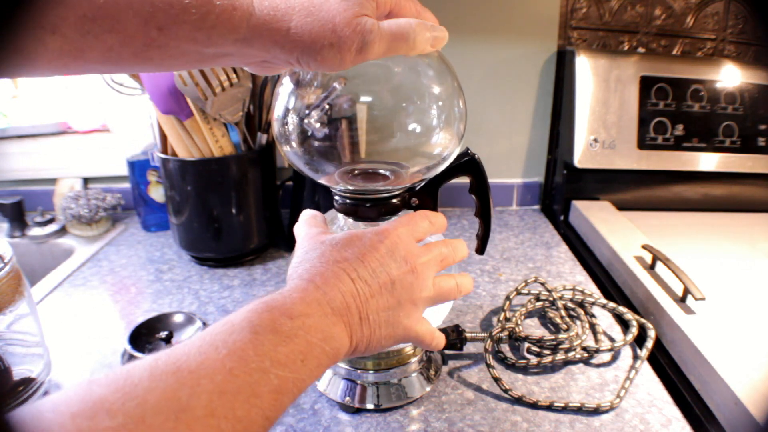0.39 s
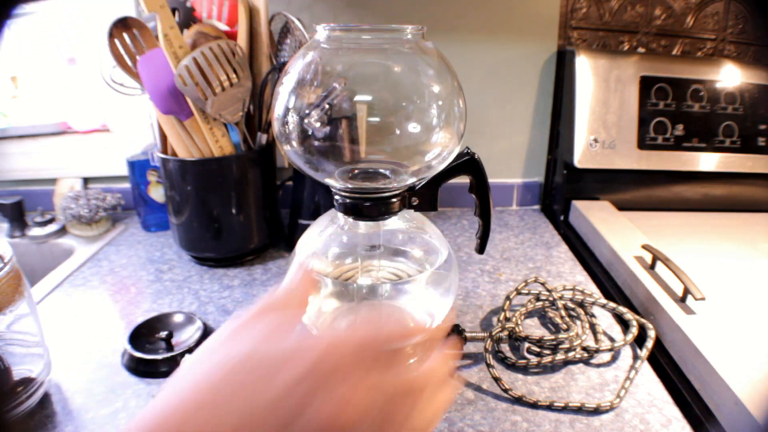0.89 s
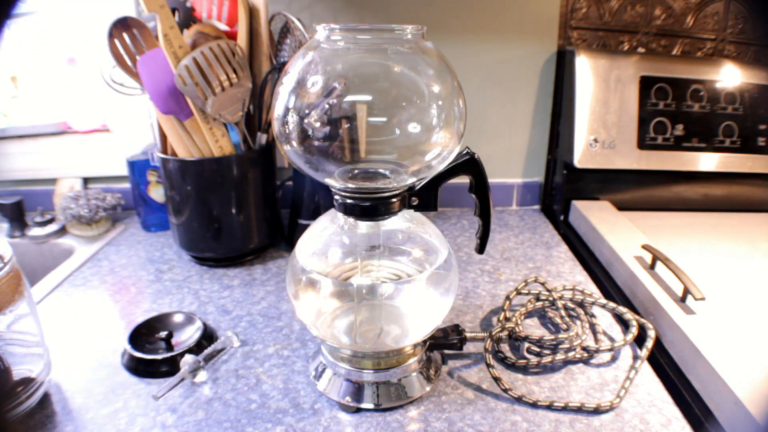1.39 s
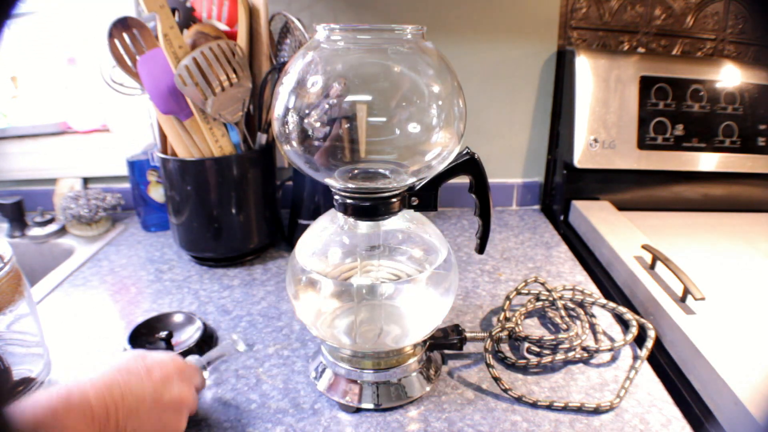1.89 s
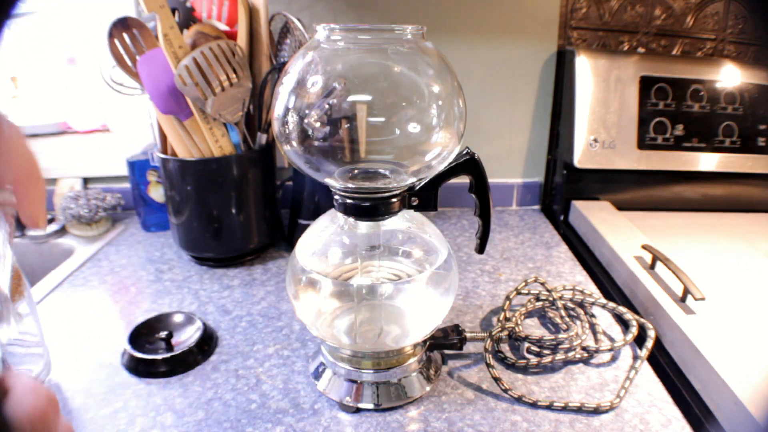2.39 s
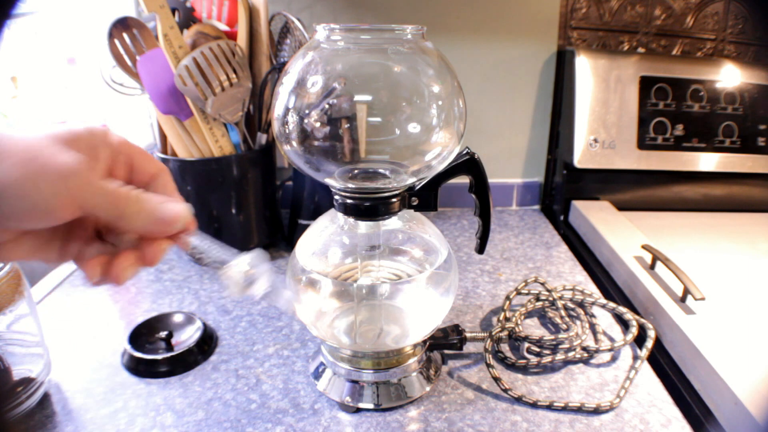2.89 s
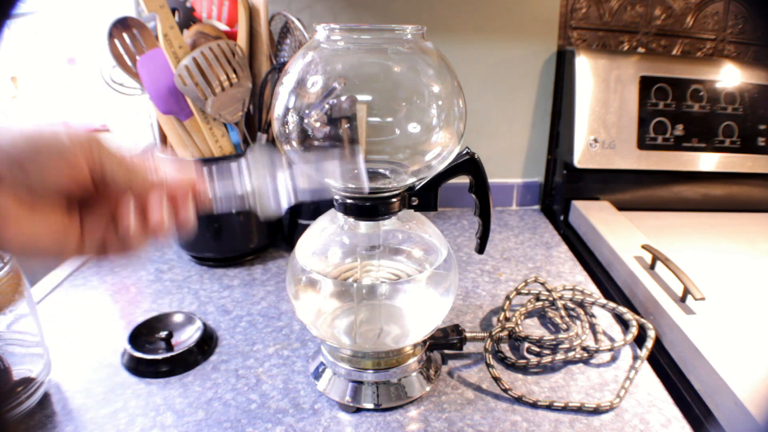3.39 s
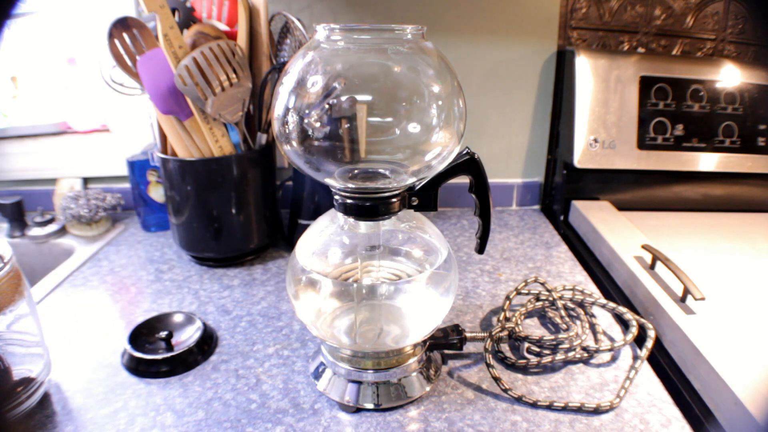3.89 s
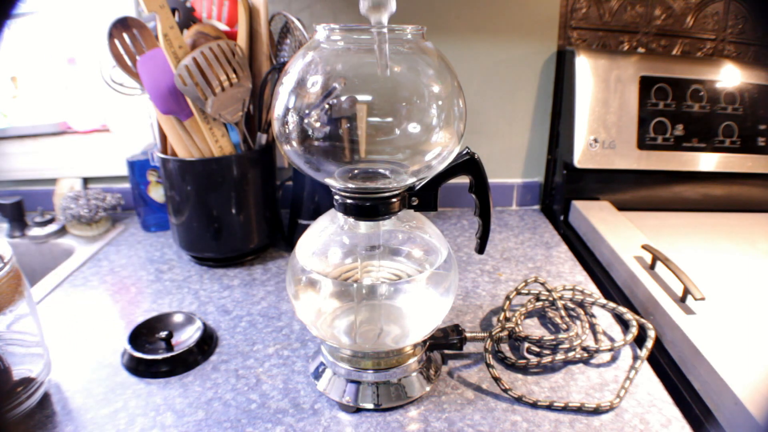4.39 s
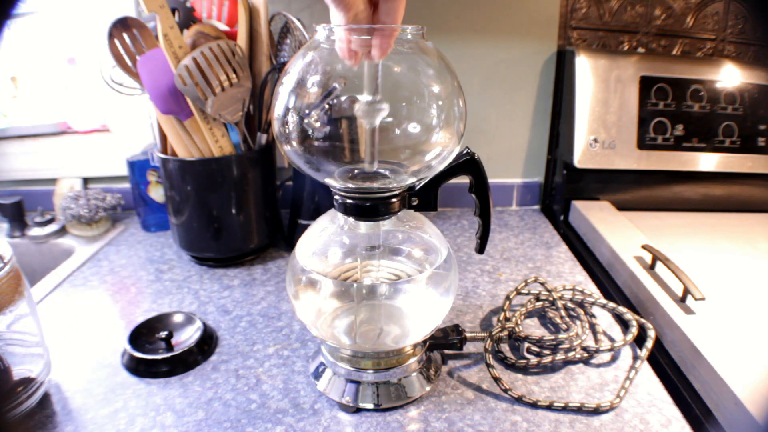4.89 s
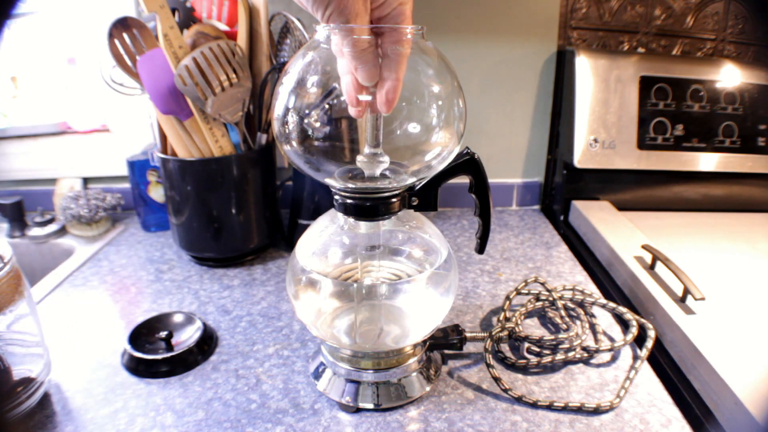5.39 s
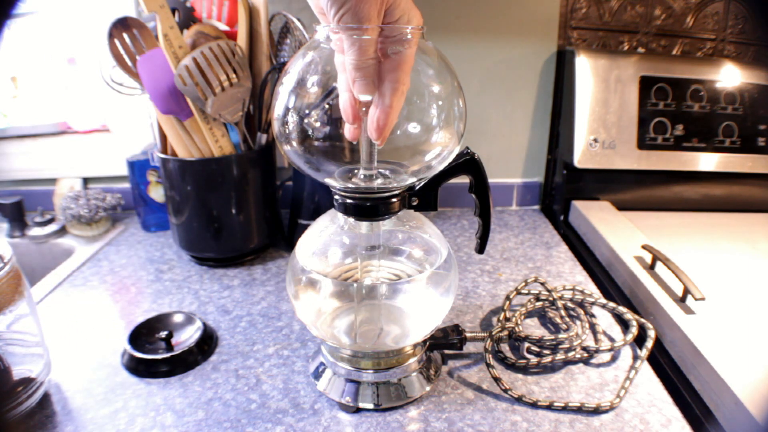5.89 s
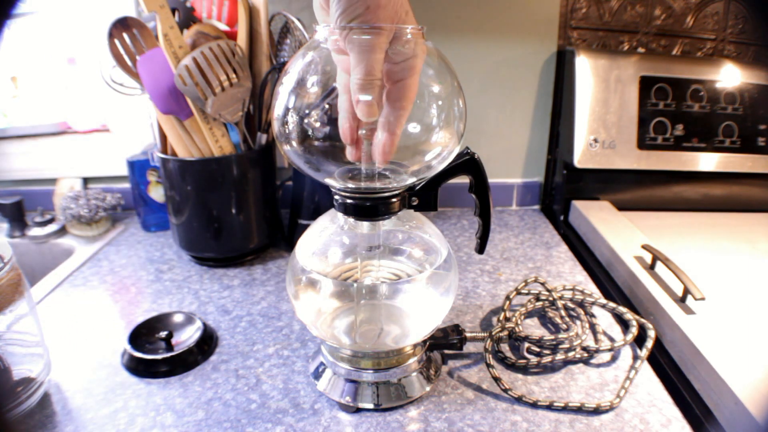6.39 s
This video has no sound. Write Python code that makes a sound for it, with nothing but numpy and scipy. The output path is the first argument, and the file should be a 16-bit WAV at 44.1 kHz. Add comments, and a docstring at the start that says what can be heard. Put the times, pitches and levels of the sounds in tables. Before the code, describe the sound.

Close, quiet kitchen: palms rub glass, a small clatter on a countertop, a pause, then a glass rod clinking and dragging in a bowl.

```python
"""A glass rod is lowered by hand into a glass bowl, close to the microphone in a quiet kitchen. It clinks
and drags on the wall: ringing modes driven by blows and grit. The grip tightens as the rod goes deeper,
so its ring sinks in pitch. Before that, palms twist the bowl onto a pot in gritty skin noise and damped
glass modes, a metal stand rattles, and the rod rolls and knocks on the counter in short dull modes.
Behind: sleeve rustle, small ticks, air hiss, an appliance drone, mains hum and the kitchen's echoes."""
import sys
import numpy as np
from scipy import signal
from scipy.io import wavfile
from scipy.ndimage import uniform_filter1d

SR = 44100
rng = np.random.default_rng(int(sys.argv[2]) if len(sys.argv) > 2 else 0)


def unload_wav(signal):
    """Save mono or channel-first audio to the path in sys.argv[1] as 16-bit WAV at rate SR, clipped to [-1, 1]."""
    wavfile.write(
        sys.argv[1],
        SR,
        np.round(np.clip(np.atleast_2d(signal).T, -1, 1) * 32767).astype(np.int16),
    )


def level_to_linear(level):
    """Convert decibel levels to linear amplitude factors, elementwise."""
    exponent = np.asarray(level, float) / 20
    return 10 ** exponent


N = 287973  # samples
START = 5 * SR  # samples; the bowl and rod modes ring only from here

# clinks of rod on bowl: start_s, rod_db, then bowl_db at each of the three tones
CLINKS = [(5.1153, -28.5, -25, -22.5, -15.5), (5.1225, -49, -41, -45, -30),
          (5.371, -29.5, -28.5, -5.5, -15.5), (5.3773, -24.5, -51, -47, -35), (5.57, -46, -50, -41, -16.5),
          (5.5739, -32, -23.5, -9.5, -55), (5.622, -16, -20, -11.5, -26),
          (5.7276, -30.5, -32, -13.5, -38.5), (5.9255, -75, -29.5, -48, -81), (5.943, -43, -56, -34, -42),
          (6.058, -57, -53, -43, -66), (6.306, -48, -28.5, -44, -64), (6.324, -60, -25.5, -33, -52),
          (6.336, -28, -27.5, -19.5, -22.5), (6.349, -31.5, -22.5, -16, -36),
          (6.4819, -31.5, -24, -17.5, -62), (6.509, -29, -31, -21, -63)]
# the three tones at which the colour of a clink is given: tone_hz
TONES_HZ = [800, 2280, 7900]
# rod dragging on the wall: start_s, hold_s, rod_db, low_modes_db, high_modes_db
DRAGS = [(5.574, 0.011, -29, -29.5, -35), (5.627, 0.034, -49, -23, -29.5),
         (5.689, 0.056, -33.5, -22.5, -48), (5.936, 0.064, -47.5, -48, -70),
         (6.344, 0.054, -39.5, -34.5, -42), (6.481, .06, -35, -24.5, -51)]
# how a drag's level moves: rise, sag while held, fall [all dB a second]
DRAG_SLOPES = (2800, 166, 800)
# when the rod tip passes rim, shoulder, belly and neck: time_s
PLACES_S = [5.12, 5.37, 5.65, 6.34]
# pitches of the bowl's modes: pitch_hz
BOWL_HZ = [700, 812, 1090, 1635, 1812, 2078, 2255, 2440, 2700, 3740, 4085, 4400, 4660, 5212, 7200, 7526,
           7650, 7775, 7935, 8180, 8825, 9085, 9465, 9980, 10348, 10740, 11140, 11840, 12300, 13520]
# the bowl's modes, one row per pitch: t60_s, then level_db when touched at rim, shoulder, belly, neck
BOWL_MODES = [(0.13, -7, -6, -13, -8.5), (0.079, -2.5, 2.5, -1, -2.5), (0.016, 4, 8, 7, 9),
              (0.092, -10, -10, -8.5, -11.5), (0.019, -13, -16, 1.5, 3.5), (0.033, 1, 4.5, -0.5, -9),
              (0.033, 3, 3.5, -6.5, 4), (0.029, -26, 7, -6, -4.5), (0.022, -9, -4.5, -13, -14),
              (0.019, -38, -36, -4.5, -10), (.1, -15, -21, -9.5, -27), (0.056, -11, -23, -6.5, -10),
              (0.035, -35, -41, -10, -6), (0.035, -10, -7, -8, -5), (0.033, -3, -6, -12, -5),
              (0.053, 1.5, -3, -12, -1), (0.1, -4, -20, -22, -14), (0.071, -2, 4, -1.5, -2.5),
              (0.078, -11, -5, -18, -16), (0.026, -7, -7, 2.5, 6.5), (0.09, 3, -9, -4, -10),
              (0.082, -18, -15, -32, -19), (0.066, -31, -8, -40, -28), (0.058, -30, -7, -28, -35),
              (0.08, -19, 0, -26, -29), (0.068, -20, -11, -22, -27), (0.075, 4, -4, -12, -24),
              (0.066, -3, -24, -22, -25), (0.068, -14, -16, -22, -28), (.04, -15, -26, -24, -26)]


def bowl():
    """Clinks and drags drive the bowl's modes by their colour and by the place they touch."""
    # the bowl is not quite round: each mode has a close, fainter twin that rings longer
    twin_ratio, twin_db, twin_lasts = 1.003, -23, 3.6
    start_s, _, *tones_db = np.transpose(CLINKS)
    drag_s, hold_s, _, low_db, high_db = np.transpose(DRAGS)
    t = np.arange(START, N) / SR
    catches = grit(2500, 2.5)
    low = (catches * strokes(drag_s, hold_s, low_db, DRAG_SLOPES))[START:]
    high = (catches * strokes(drag_s, hold_s, high_db, DRAG_SLOPES))[START:]
    out = np.zeros(N)
    for hz, (t60, *place_db) in zip(BOWL_HZ, BOWL_MODES):
        blow_db = [read(list(zip(TONES_HZ, clink_db)), hz) for clink_db in np.transpose(tones_db)]
        drag = low if hz < 3000 else high
        drive = blows(start_s, blow_db)[START:] + drag
        answer = level_to_linear(np.interp(t, PLACES_S, place_db))
        drive = bloom(drive * answer, hz, 0.0018)
        out[START:] += ring(drive, hz, t60)
        out[START:] += level_to_linear(twin_db) * ring(drive, hz * twin_ratio, t60 * twin_lasts)
    # the bare catches of a drag, heard beside the ring
    out[START:] += level_to_linear(12.5) * np.diff(high + level_to_linear(-11) * low, prepend=0)
    return out + cracks(start_s, tones_db[1], tones_db[2])


def cracks(start_s, middle_db, treble_db):
    """The bare tick of glass on glass under the ring: a noise burst, its dull and bright parts apart."""
    age_s = np.arange(800) / SR
    tick = rng.standard_normal(800) * level_to_linear(-60 * age_s / 0.014)
    dull = signal.sosfilt(signal.butter(4, 3200, fs=SR, output="sos"), tick)
    bright = tick - dull
    out = level_to_linear(2) * signal.oaconvolve(blows(start_s, middle_db), dull)
    out = out + level_to_linear(-1) * signal.oaconvolve(blows(start_s, treble_db), bright)
    return out[:N]


# the held rod's modes before any shift, the lowest being the air in the bowl: pitch_hz
ROD_HZ = [296, 1348, 3322, 5592, 8580]
# the rod's modes, one row per pitch: t60_s, then level_db at the four places, share of the pitch shift
ROD_MODES = [(0.2, -30, 0, -0.5, 7, 1.62), (0.17, 4, -1, 0.5, 1, 1.05), (0.069, -29, -5, -7, -9, 0.74),
             (0.013, 3, -4, -6, -8, 0.415), (0.051, -12, -9, -10.5, -8, 0.57)]
# pitch shift as hand and rod go down: time_s, shift [fraction of the pitch, at a share of 1]
GRIP = [(5.12, .05), (5.38, .022), (5.58, .003), (5.7, -.003), (5.95, -.02), (6.33, -.067), (6.5, -.08)]
# the rod singing on the wall: start_s, hold_s, level_db of the second mode, overtones_db of those above
SINGING = [(5.586, 0.038, -27.5, -47), (5.648, 0.042, -17.5, -25.5), (5.737, .14, -36.5, -56)]
# how the song's level moves: rise, sag while held, fall [all dB a second]
SING_SLOPES = (1360, 117, 3000)


def rod():
    """The rod rings at the pitch its grip allows; sticking and slipping on the wall, it sings there too."""
    start_s, rod_db = np.transpose(CLINKS)[:2]
    t = np.arange(START, N) / SR
    drags = grit(2700, 3.3) * strokes(*np.transpose(DRAGS)[:3], DRAG_SLOPES)
    drive = (blows(start_s, rod_db) + drags)[START:]
    shift = np.interp(t, *np.transpose(GRIP))
    sing_s, hold_s, song_db, overtones_db = np.transpose(SINGING)
    song = strokes(sing_s, hold_s, song_db, SING_SLOPES)[START:]
    overtones = strokes(sing_s, hold_s, overtones_db, SING_SLOPES)[START:]
    out = np.zeros(N)
    for k, (hz, (t60, *place_db, share)) in enumerate(zip(ROD_HZ, ROD_MODES)):
        answer = level_to_linear(np.interp(t, PLACES_S, place_db))
        pitch_hz = hz * (1 + share * shift)
        out[START:] += ring(bloom(drive * answer, hz, 0.00146), pitch_hz, t60)
        if k == 0:  # the air in the bowl does not sing
            continue
        # contact wavers, most in the overtones
        flutter_db = (1.4 + 1.2 * k) * evened(uniform_filter1d(rng.standard_normal(len(t)), 450))
        level = answer * level_to_linear(flutter_db) * (overtones if k > 1 else song)
        out[START:] += level * np.sin(2 * np.pi * np.cumsum(pitch_hz) / SR)
    return out


# counter and plastic lid, dull and short: pitch_hz, level_db, t60_s
COUNTER_MODES = [(400, -43, 0.044), (510, 1.5, 0.032), (602, 13.5, 0.021), (703, 11.5, 0.012),
                 (865, -3.5, 0.012), (1020, 6.5, 0.017), (1300, 7.5, 0.017), (1550, -14, 0.022),
                 (1706, 8.5, 0.0074), (1895, 6.5, 0.0099), (2240, 8.5, 0.0042), (2505, -1, 0.0073),
                 (2770, -32, .02), (4780, -11, 0.0024), (8040, -24.5, 0.0031), (10200, -24.5, 0.0019)]
# knocks on the counter: start_s, level_db, tilt_db [an octave]
KNOCKS = [(1.841, -25, -16), (1.854, -19, -13.5), (1.8835, -26, 5), (1.884, -7, -13.5),
          (1.888, -11.5, -3.5), (1.893, -19, -7.5), (1.918, -22, -22), (1.939, -25, -4.5), (1.9578, -20, 2),
          (1.9587, -19, 7), (1.963, -6, -17), (1.9683, -35, 9)]
# rod rolling against the lid: start_s, hold_s, level_db
ROLLS = [(1.842, .005, -28), (1.895, 0.0067, -24), (1.93, 0.032, -30)]
# how a roll's level moves: rise, sag while held, fall [all dB a second]
ROLL_SLOPES = (1300, 30, 570)


def counter():
    """The rod rolls against the lid with a bumpy rumble and knocks the counter: grit and blows on modes."""
    rolling = grit(186, 6.4) * strokes(*np.transpose(ROLLS), ROLL_SLOPES)
    return struck(COUNTER_MODES, KNOCKS, rolling, -5)


# palms twisting the bowl: start_s, hold_s, level_db, tilt_db [an octave]
TWIST = [(0.0, 0.0046, -35, -5.5), (0.057, 0.084, -27.5, -4), (0.179, .004, -41, -1.5),
         (0.206, 0.1, -27, -2.5), (0.346, 0.037, -29, -3), (0.6, 0.016, -50, 2), (0.662, 0.02, -32, -3),
         (0.724, 0.0026, -38.5, 1.6)]
# how a twist's level moves: rise, sag while held, fall [all dB a second]
TWIST_SLOPES = (740, 28, 770)
# colour of skin on glass: freq_hz, level_db [per Hz, relative]
SKIN = [(88, -56), (150, -23), (193, -5), (334, -2.5), (391, 1), (484, -14), (730, -4.5), (923, -21),
        (1760, 1), (4240, -8), (8730, -6.5), (14200, -3), (16000, -70)]
# glass damped under the palms: pitch_hz, width_hz [a wider mode dies sooner], level_db
SKIN_RING = [(700, 146, -16.5), (1152, 68, -17), (1470, 27, -21), (2038, 74, -12.5), (3280, 81, -16.5),
             (5230, 160, -20.5), (7650, 260, -14.5), (8660, 390, -11.5), (8840, 120, -19.5),
             (9240, 120, -42)]


def palms():
    """Skin slips on glass in gritty noise and sets the damped bowl singing."""
    start_s, hold_s, level_db, tilt_db = np.transpose(TWIST)
    middle_s = start_s + hold_s / 2

    def skin_db(hz, t):
        return read(SKIN, hz) + np.interp(t, middle_s, tilt_db) * np.log2(hz / 3000 + 0.026)

    skin = noise(skin_db, 2.0, size=256)
    slips = level_to_linear(1.3 * evened(uniform_filter1d(rng.standard_normal(N), 150)))
    rough = rng.standard_normal(N) * slips
    sung = sum(level_to_linear(db) * evened(ring(rough, hz, 4.0 / width)) for hz, width, db in SKIN_RING)
    return strokes(start_s, hold_s, level_db, TWIST_SLOPES) * evened(skin * slips + sung)


# small slips and grabs of the palms: start_s, level_db, tilt_db [an octave]
SLIPS = [(.031, -42, -3), (.039, -40, 0), (.048, -19, -5.5), (.148, -37, 1), (.178, -37.5, 1),
         (.529, -49, 1), (.655, -20, -20), (.728, -34.5, -3.5)]


def grabs():
    """A sudden slip of skin knocks the damped bowl, ringing its modes once."""
    modes = [(hz, db + 15, 2.0 / width) for hz, width, db in SKIN_RING]
    return struck(modes, SLIPS)


# metal stand: pitch_hz, level_db, t60_s
STAND_MODES = [(1580, -2.5, 0.71), (4300, -1.5, 0.076), (7170, -22, 0.15), (10300, -28, .1)]
# its rattles: start_s, level_db, tilt_db [an octave]
PINGS = [(0.685, -47, 8), (.696, -57, 12), (0.715, -66, 8), (.727, -56, 14), (0.797, -65, 15.5),
         (0.821, -38.5, 0), (0.847, -48, -5)]


def stand():
    """The metal stand rattles: light blows on a few long modes."""
    return struck(STAND_MODES, PINGS)


# short ticks of fingers, rod and lid: start_s, level_db, pitch_hz, t60_s
TICKS = [(0.468, -23, 400, 0.01), (.685, -31.5, 1530, 0.04), (1.748, -37, 2370, 0.064),
         (1.9588, -9, 2850, 0.005), (2.83, -50, 8820, .08), (3.099, -32, 3400, 0.011),
         (3.38, -52, 3300, .015), (3.71, -39, 5000, .005), (3.75, -43, 2390, 0.076),
         (5.794, -34.5, 2385, 0.072), (5.944, -30.5, 3150, 0.054), (6.062, -39, 2990, .02)]


def ticks():
    """Each tick is one push on one short mode."""
    return sum(ring(blows([s], [db]), hz, t60) for s, db, hz, t60 in TICKS)


# sleeve rustling: start_s, hold_s, level_db
RUSTLE = [(1.374, 0.051, -43.5), (2.658, 0.11, -50.5), (3.097, .004, -41.5), (3.366, 0.051, -49.5)]
# how a rustle's level moves: rise, sag while held, fall [all dB a second]
RUSTLE_SLOPES = (460, 31, 470)
# colour of cloth: freq_hz, level_db [per Hz, relative]
CLOTH = [(300, -8), (1500, 0.5), (3000, -1.5), (8000, -13.5), (12000, -17), (16000, -34)]


def sleeve():
    """Cloth only hisses: coloured noise let through in short strokes."""
    cloth = noise(lambda hz, t: read(CLOTH, hz) + 0 * t, 0.31, size=256)
    return strokes(*np.transpose(RUSTLE), RUSTLE_SLOPES) * cloth


# colour of the room tone before the hiss: freq_hz, level_db [per Hz, relative]
AIR = [(12, -50), (20, -39), (53, -16), (91, -12.5), (113, -11), (193, -7.5), (222, 0), (434, -2),
       (574, -2.5), (949, -5), (1530, -9), (1810, -12), (2390, -16), (9400, -32), (16000, -49.5)]


def room_air():
    """Steady air noise, with a treble hiss that fades slowly against the rest."""
    def air_db(hz, t):
        hiss_db = 8.5 - 0.35 * t  # reached only well above 2500 Hz
        return read(AIR, hz) + hiss_db * hz / (hz + 2500)

    return level_to_linear(-47.5) * noise(air_db, 0.6, size=2048)


# appliance drone: pitch_hz, level_db [rms], width_hz
DRONE = [(54.4, -70, 5.9), (208.2, -60, 23), (400, -56.5, 31)]


def appliance():
    """A wavering drone: noise through a few narrow resonances."""
    return sum(level_to_linear(db) * evened(ring(rng.standard_normal(N), hz, 2.24 / width)) for hz, db, width in DRONE)


# steady electric hum, a single row: pitch_hz, level_db [peak]
MAINS = (120, -64)


def mains_hum():
    """Steady electric hum: one sine."""
    hz, level_db = MAINS
    return level_to_linear(level_db) * np.sin(2 * np.pi * hz * np.arange(N) / SR)


# near echoes off counter and tiles: delay_s, level_db [relative to the direct sound]
ECHOES = [(.0013, -13), (.0032, -12), (.0062, -15), (.0078, -12), (0.009, -15), (0.0129, -32)]
# how fast the kitchen dies away: freq_hz, t60_s
KITCHEN_DECAY = [(300, 0.26), (1500, 0.2), (5000, 0.24), (12000, 0.028)]


def kitchen(x):
    """A few near echoes, then sparse taps of random sign, each band dying at its own speed."""
    taps = np.zeros(SR // 2)
    at = np.arange(300, len(taps) - 20, 20)
    taps[at + rng.integers(0, 20, len(at))] = rng.choice([-1., 1.], len(at))
    hz, t, z = signal.stft(taps, SR, nperseg=256)
    decay_db = -60 * t / read(KITCHEN_DECAY, hz)[:, None]
    tail = signal.istft(z * level_to_linear(decay_db), SR, nperseg=256)[1]
    tail *= level_to_linear(-12) / np.linalg.norm(tail)
    tail[0] += 1  # the direct sound
    for delay_s, db in ECHOES:
        tail[round(delay_s * SR)] += level_to_linear(db)
    return signal.oaconvolve(x, tail)[:N]


def evened(x):
    """Scales to rms 1."""
    return x / np.sqrt(np.mean(x ** 2) + 1e-20)


def read(points, hz):
    """Looks a value up on a log-frequency axis."""
    f, value = np.transpose(points)
    return np.interp(np.log(hz + 1), np.log(f + 1), value)


def blows(s, db):
    """Single pushes at given times."""
    out = np.zeros(N)
    np.add.at(out, np.round(np.asarray(s) * SR).astype(int), level_to_linear(np.asarray(db)))
    return out


def ring(drive, hz, t60):
    """A dying mode, fixed or gliding: a push of 1 rings at height 1."""
    r = np.exp(-np.log(1000) / (max(t60, .002) * SR))
    if np.ndim(hz) == 0:
        w = 2 * np.pi * hz / SR
        return signal.lfilter([0, np.sin(w)], [1, -2 * r * np.cos(w), r * r], drive)
    turn = np.exp(2j * np.pi * np.cumsum(hz) / SR)
    return (turn * signal.lfilter([1], [1, -r], drive / turn)).imag


def bloom(drive, hz, rise_s):
    """A contact is not instant: the push builds the mode up over a short while."""
    t = np.arange(max(round(rise_s * SR), 3)) / SR
    window = np.hanning(len(t) + 2)[1:-1]
    push = 2 * window * np.cos(2 * np.pi * hz * t) / window.sum()
    return np.convolve(drive, push)[:len(drive)]


def struck(modes, hits, extra=0, extra_tilt_db=0):
    """Hits with a tilt, and any rubbing, ring one table of modes; a contact lasts about two cycles."""
    s, db, tilt_db = np.transpose(hits)
    out = np.zeros(N)
    for hz, mode_db, t60 in modes:
        octaves = np.log2(hz / modes[0][0])  # above the first mode
        drive = blows(s, db + tilt_db * octaves) + extra * level_to_linear(extra_tilt_db * octaves)
        out += level_to_linear(mode_db) * ring(bloom(drive, hz, 2.3 / hz), hz, t60)
    return out


def grit(per_s, spread_db):
    """Tiny random catches of uneven size, scaled to ring a glass mode at about rms 1."""
    size = level_to_linear(spread_db * np.minimum(rng.exponential(1, N), 4)) * rng.choice([-1., 1.], N)
    return evened(size * (rng.random(N) < per_s / SR)) / 16


def strokes(s, hold_s, db, slopes):
    """Gain of rubbing strokes: each rises, sags while held and falls away, at steady rates in dB."""
    rise, sag, fall = np.abs(slopes)
    out, t = np.zeros(N), np.arange(-SR // 4, SR // 2) / SR
    for start, hold, top_db in zip(s, np.abs(hold_s), db):
        at = round(start * SR) - SR // 4 + np.arange(len(t))
        inside = (at >= 0) & (at < N)
        lost_db = rise * np.maximum(-t, 0) + sag * np.clip(t, 0, hold) + fall * np.maximum(t - hold, 0)
        out[at[inside]] += level_to_linear(top_db - lost_db)[inside]
    return out


def noise(shape_db, patchy_db, size=512):
    """Random short-time spectra; shape_db(hz, s) gives the colour, drifting patches roughen it."""
    hop = size // 4
    frames, hz = N // hop + 5, np.fft.rfftfreq(size, 1 / SR)
    a, b, patches = rng.standard_normal((frames, len(hz), 3)).T
    patches = evened(uniform_filter1d(uniform_filter1d(patches, 8, 0), 12, 1))
    colour_db = shape_db(hz[:, None], np.arange(frames) * hop / SR)
    z = (a + 1j * b) * level_to_linear(colour_db + patchy_db * patches)
    return evened(signal.istft(z, nperseg=size, noverlap=size - hop)[1][:N])


# small things radiate no bass and the microphone dulls the top: low_hz, high_hz
RADIATE_HZ = [230, 9860]


def scene():
    """Everything near the microphone sounds into the kitchen; the thin rod is heard mostly straight."""
    radiate = signal.butter(3, RADIATE_HZ, "band", fs=SR, output="sos")
    near = bowl() + counter() + palms() + grabs() + stand() + ticks() + sleeve()
    near, held = signal.sosfilt(radiate, [near, rod()])
    in_kitchen = level_to_linear(-3.5) * kitchen(near + level_to_linear(-16.5) * held)
    background = room_air() + appliance() + mains_hum()
    return (in_kitchen + held + background)[None]


def low_pass(x):
    """Removes everything above the highest recorded frequency."""
    return signal.sosfilt(signal.butter(12, 16310, fs=SR, output="sos"), x)


def record(dry):
    """Gain control at the microphone ducks after loud sounds and recovers; peaks are clipped."""
    power_db = 10 * np.log10(abs(uniform_filter1d(dry[0] ** 2, 400)) + 1e-12)
    fall_db = np.arange(N) * 53.0 / SR  # the held level falls 53 dB a second
    held_db = np.maximum.accumulate(power_db + fall_db) - fall_db
    over_db = np.maximum(held_db + 18.0, 0)  # above -18 dB
    late_db = signal.lfilter([.002], [1, -.998], over_db)  # the gain follows about 11 ms late
    mix = np.clip(dry / level_to_linear(0.56 * late_db), -.97, .97)
    return low_pass(mix)


dry = scene()
out = record(dry)
unload_wav(out)
```